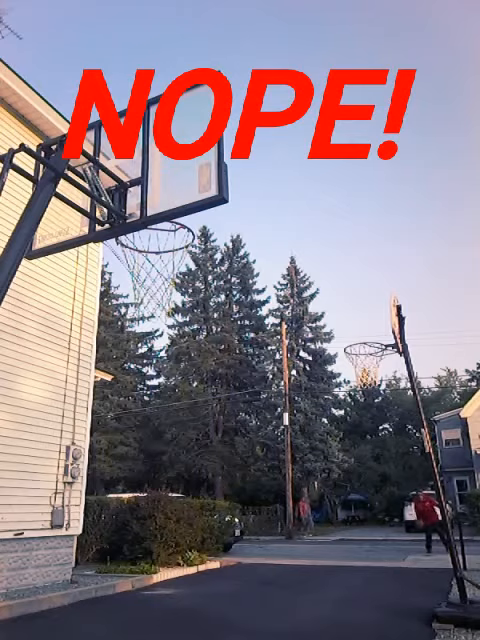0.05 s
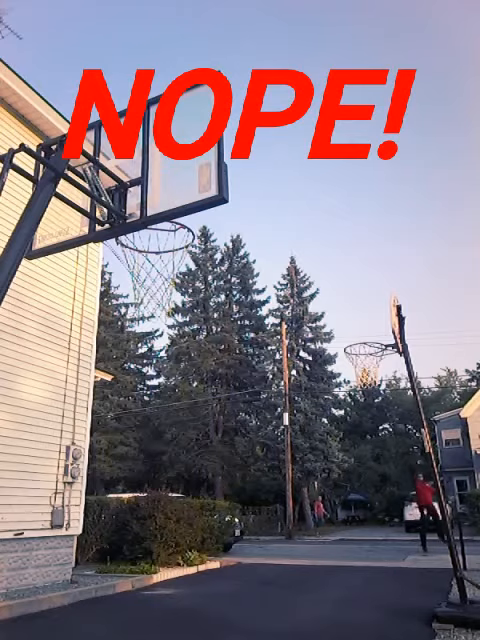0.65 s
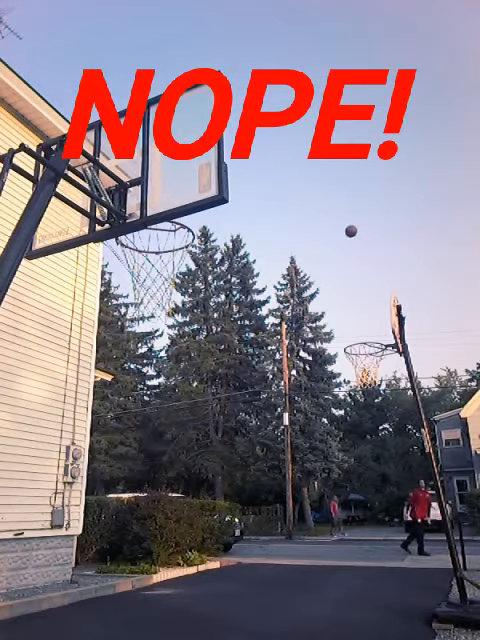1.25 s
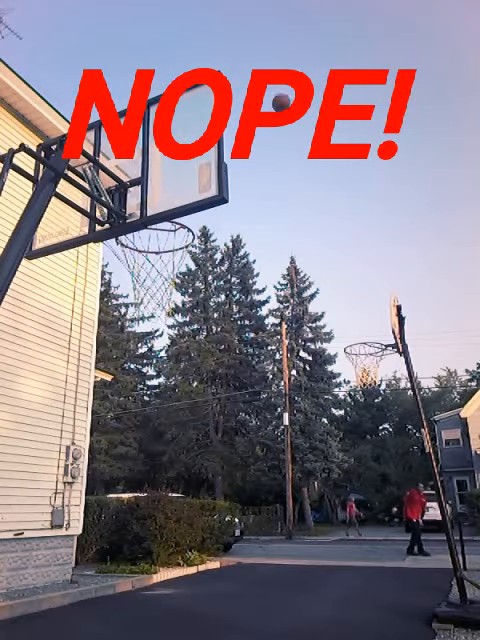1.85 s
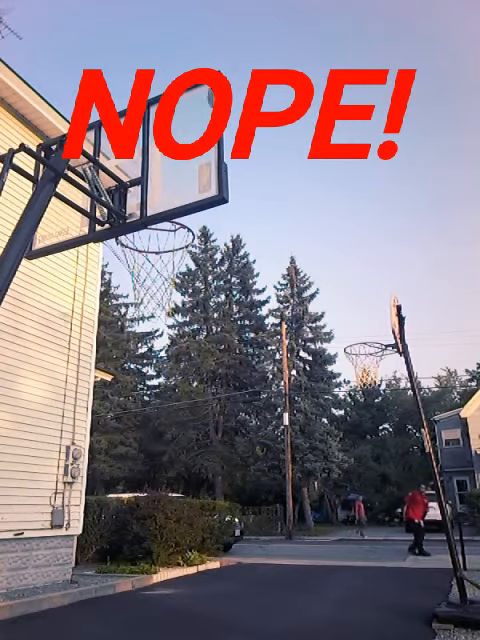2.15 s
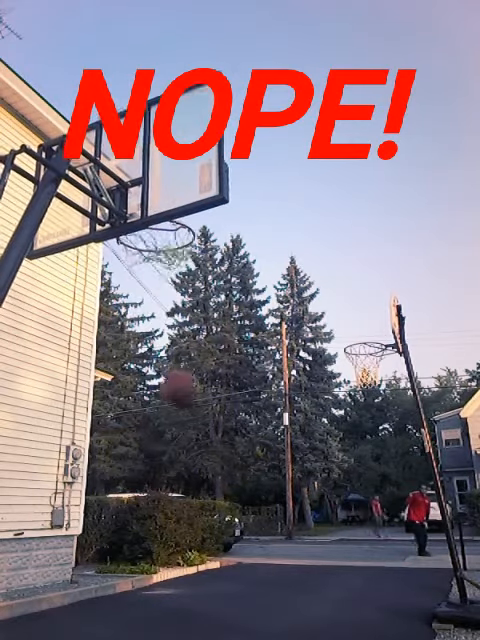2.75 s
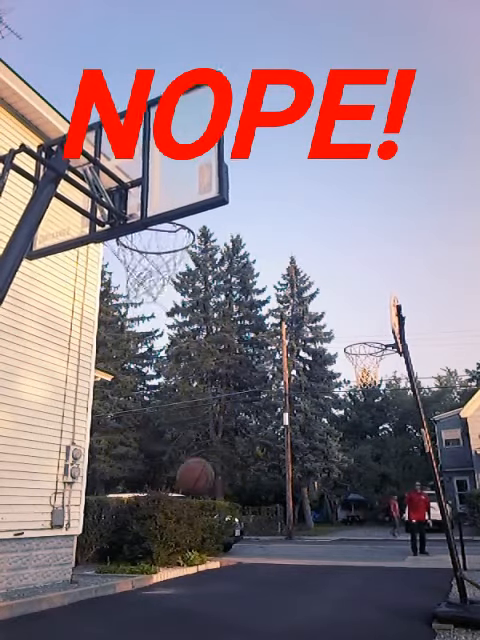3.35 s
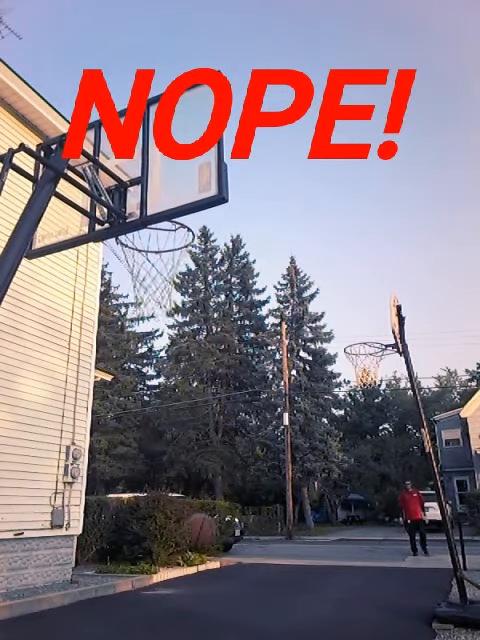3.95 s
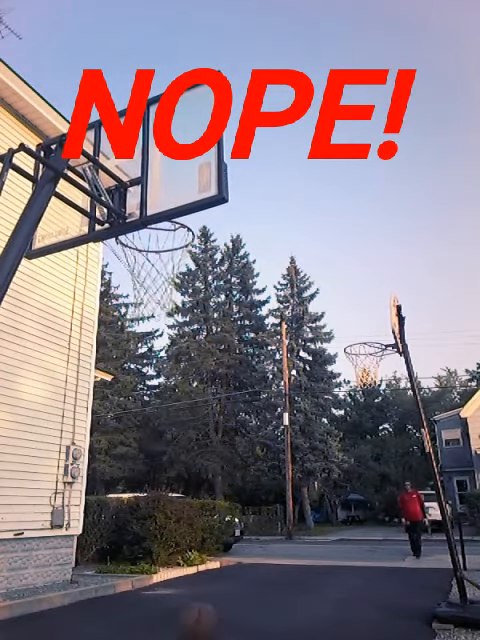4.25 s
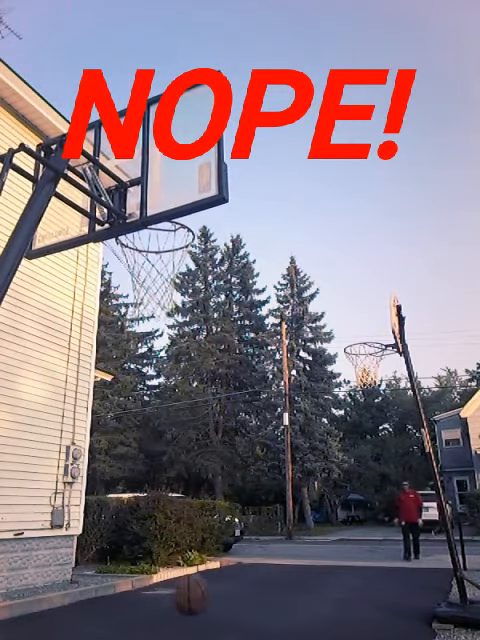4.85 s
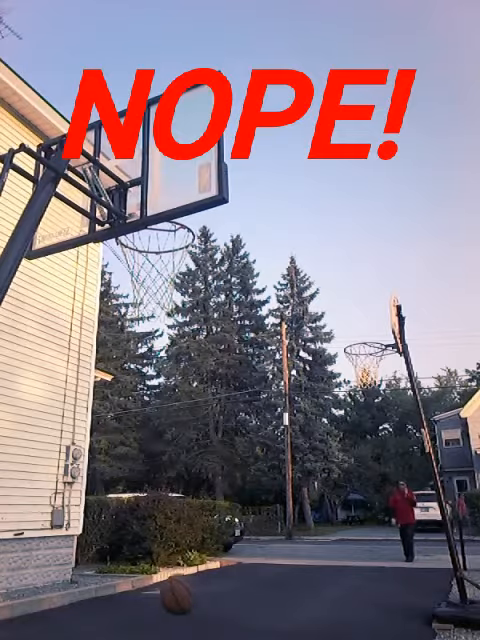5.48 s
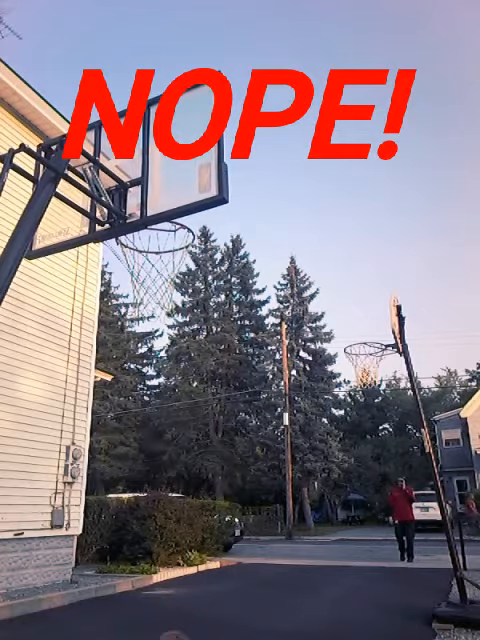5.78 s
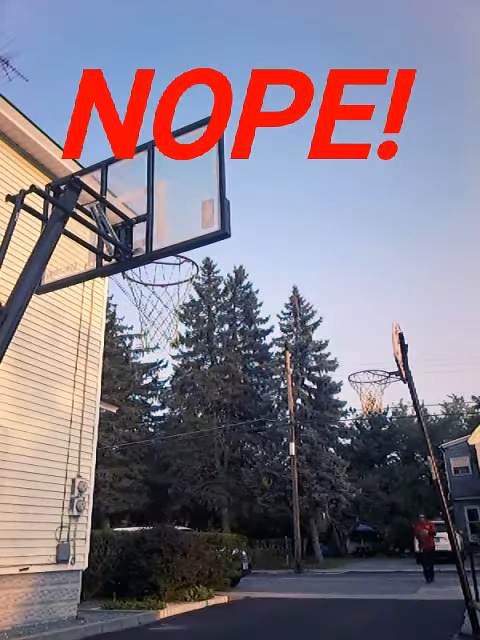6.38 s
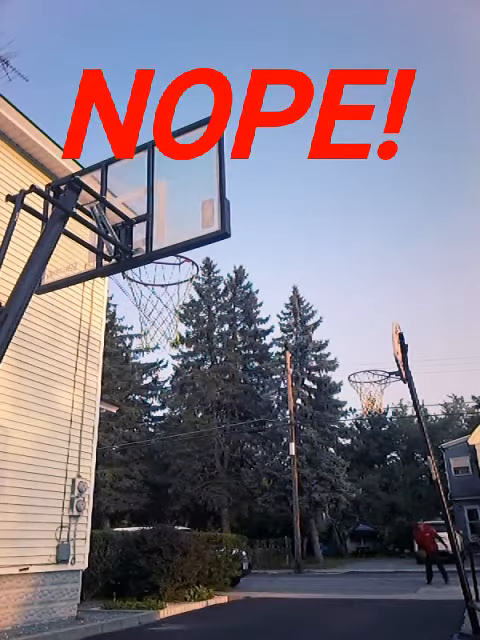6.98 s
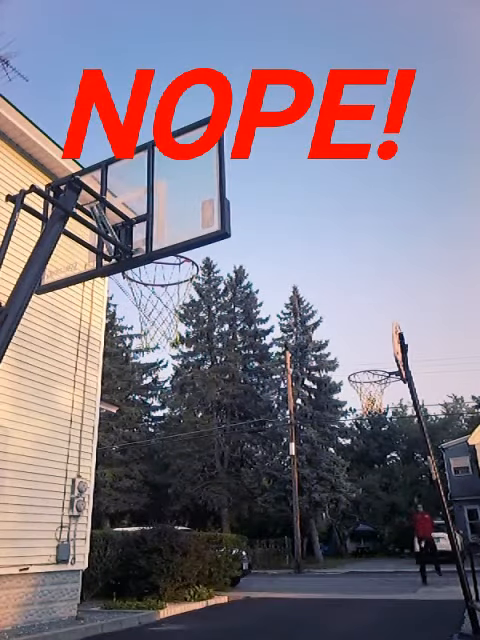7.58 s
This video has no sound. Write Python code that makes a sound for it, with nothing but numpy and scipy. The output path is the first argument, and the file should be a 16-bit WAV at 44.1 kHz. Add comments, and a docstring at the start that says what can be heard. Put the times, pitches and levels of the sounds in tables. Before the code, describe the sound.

A quiet outdoor street: distant traffic murmurs and rumbles throughout, and an insect gives faint, high chirps, often a little over half a second apart. A shoe scuffs very softly at about 1 second. At 2.5 seconds a basketball hits a portable hoop with a loud bang; board and pole boom, fittings rattle and the net whips for about half a second, leaving a faint steel ring. The ball bounces on asphalt at about 3.1, 4.2, 5.1 and 5.8 seconds, each sharp thump weaker, with a short echo off the house. Underneath, a low engine hum swells until around 5 seconds and fades. Just before 6 seconds the ball knocks the foot of the stand, which shudders briefly. The background then grows quieter, with a far car's low drone and a few very faint bird notes from about 7 seconds to the end.

```python
"""Street traffic murmurs, an insect chirps with its wings and a shoe scuffs the road.
At 2.5 seconds a basketball bangs into a portable hoop: board and pole boom, fittings rattle, the net whips.
While a car's hum swells, the ball bounces four times on asphalt, each thump echoing off a house wall.
Near 6 seconds it knocks the foot of the stand, which shudders. Last, a far car drones and a bird calls."""
import sys
import numpy as np
from scipy import signal
from scipy.fft import rfft, irfft, next_fast_len
from scipy.io import wavfile
from scipy.ndimage import map_coordinates

SR = 44100
rng = np.random.default_rng(int(sys.argv[2]) if len(sys.argv) > 2 else 0)


def output_pcm(signal):
    """Save a mono or channel-first signal as 16-bit PCM at the path in sys.argv[1].

    Samples are clipped to [-1, 1] before scaling.
    """
    pcm = np.clip(np.atleast_2d(signal).T, -1, 1) * 32767
    wavfile.write(sys.argv[1], SR, np.round(pcm).astype(np.int16))


N = 340452

# Tone colours. Each row: frequency in Hz, relative level in dB.
RUMBLE_COLOUR = [(20, -52), (38, -21.5), (58, -5), (90, 2), (112, 2.5), (140, -3.5), (243, -7),
                 (337, -17.5), (450, -30), (1000, -70)]  # low part of the traffic
MURMUR_COLOUR = [(150, -28.5), (400, 2), (1000, -4), (1600, -8.5), (2800, -17), (3800, -29.5), (5400, -36),
                 (6700, -26), (8300, -34), (15500, -31.5)]  # higher part of the traffic
SCUFF_COLOUR = [(2500, -5), (4000, -10), (5400, -18.5), (6300, 3.5), (7200, 1), (8200, -3), (9000, -21),
                (12000, -40)]  # a shoe scraping the road
STEP_COLOUR = [(100, -22), (500, 3), (1400, 7), (2800, -5.5), (4500, -34.5), (12000, -46)]  # a duller shuffle
CHORUS_COLOUR = [(3800, -52), (4400, -3), (4620, -6.5), (5200, -47.5)]  # other insects far off
SHAKE_COLOUR = [(29, -42), (50, -19), (120, 2.5), (172, -14), (217, -12), (306, -25), (376, -19),
                (609, -20.5), (920, -19.5), (2200, -22), (4690, -49.5), (6600, -45), (9000, -53),
                (15600, -88), (22000, -120)]  # the jolted stand
ASPHALT_THUMP = [(25, -58), (45, -30), (60, -9), (110, 0), (170, -10), (260, -15), (380, -19), (560, -37),
                 (1500, -46), (4000, -66), (15000, -100)]  # the ball squashing on the ground
FOOT_THUMP = [(25, -63), (45, -24), (60, 2), (110, 0), (170, -4), (260, -5), (450, -22), (800, -18.5),
              (4000, -73)]  # the ball squashing on the stand's foot
GRIT_COLOUR = [(500, -9), (2500, 0.5), (4000, -12), (5300, -5.5), (6600, 2.5), (8300, -9), (10000, -21.5),
               (15000, -46.5)]  # grit under the ball
FITTINGS_COLOUR = [(300, -15.5), (800, 10), (1700, 1), (2900, -2.5), (4000, -16), (5500, -14.5),
                   (9000, -23), (15000, -42)]  # loose parts of the hoop
NET_COLOUR = [(1000, -15), (4000, -9.5), (5400, -14), (6000, -2), (6700, 3), (7500, -10), (8300, -10.5),
              (9300, -27), (15000, -34.5)]  # whipping cords
FRAME_COLOUR = [(30, -51.5), (46, -14), (58, -10.5), (90, -7.5), (115, -4), (160, 0), (225, -3), (280, -3),
                (350, -12.5), (560, -14.5), (660, -26), (1480, -31.5), (2900, -35.5), (3940, -51.5),
                (6750, -44), (9500, -59), (15500, -91)]  # the dense ring of the whole frame

# Swells. Each holds: level in dB, then rise, hold and fade time in seconds.
# A fade time (t60) is how long a sound takes to drop by 60 dB.
DRONE_SWELL = (-56, 1, 0.44, 1)  # a far car
ENGINE_SWELL = (-40.5, 2.5, -0.21, 3)  # an idling car; its negative hold starts the fade early
SCUFF_SWELL = (-65, .1, .06, .55)
STEP_SWELL = (-55, .06, .01, .3)
SHAKE_SWELL = (-45.5, .04, .11, .65)
RIM_SWELL = (-61, .08, .3, 1.3)  # the steel ring singing on faintly

# How long sound lingers. Each row: frequency in Hz, fade time in seconds.
YARD_FADES = [(100, 0.63), (1000, 0.566), (3000, 0.92), (7000, 0.27), (12000, 0.14)]
FRAME_FADES = [(80, 2.393), (250, 0.75), (600, 1.77), (1500, 1.56), (3000, 1.6), (7000, 1.9), (14000, 1.4)]
# Ringing tones. Each row: pitch in Hz, relative level in dB, fade time in seconds.
BALL_AIR_TONES = [(399.7, -8, 0.074), (711, 2, 0.029), (850, -3.5, 0.045), (931.5, 6.5, 0.04),
                  (1005, 3.5, 0.06), (1178, 7, 0.037), (1258, -1, 0.043), (1714, -14.5, 0.084),
                  (2000, -18, .06), (2370, -9, 0.03), (3000, -15, 0.044)]  # the air inside the ball
HOOP_TONES = [(55.8, -12, 1.5), (77, -19, 0.5), (122.2, -19.5, 3.5), (209.6, 1.5, .6), (224.7, -1, 1.15),
              (272.6, -1, 0.68), (279.4, -8.5, 1.3), (292, -8, 0.6), (440, -31.5, 0.48), (586, -22.5, .75),
              (687, -28.5, 0.62), (754, -20.5, .7), (1556, -30.5, 0.52), (1710, -33.5, 1.6),
              (2340, -45, 1.2), (2688, -38, .6)]  # board, rim and pole

# The background murmur's level: louder in the middle, quieter after 6 seconds.
# Each row: time in seconds, base level in dB.
BACKGROUND_LEVELS = [(0, -58.5), (1.3, -57.5), (2.0, -59.5), (3.5, -55.0), (5.6, -56), (6.4, -63),
                     (7.72, -62.0)]
# The engine's hum. Each row: multiple of the shaft speed, relative level in dB.
ENGINE_TONES = [(2, -14), (3, 2), (5, -10), (7, -8.5)]
# Bird notes. Each row: start and length in seconds, first and last pitch in Hz, level in dB.
BIRD_NOTES = [(6.922, 0.066, 4030, 3800, -77), (6.964, 0.04, 3050, 2910, -65.5),
              (7.179, 0.022, 3900, 3700, -76), (7.617, 0.092, 2500, 3840, -67.5)]
# Insect chirps. Each row: start in seconds, level in dB.
CHIRPS = [(0.065, -59.5), (.752, -60.5), (1.349, -61), (1.95, -61.5), (3.641, -59.5), (4.268, -58.5),
          (4.872, -60.5), (5.575, -60.5), (6.677, -68), (7.464, -69)]
# The ball's skin. Each row: multiple of the slap pitch, relative level in dB, fade time in seconds.
SKIN_TONES = [(.84, 6.5, 0.0055), (1, 9.5, 0.00591), (1.13, -10.5, 0.014)]
# Bounces. Each row: start in seconds, levels of thump, air ring and slap in dB, slap pitch in Hz.
BOUNCES = [(3.1475, -7, -19, -15, 2490), (4.2474, -11.5, -27, -14, 2640),
           (5.1063, -16.5, -27.5, -21.5, 2486), (5.8021, -21, -32, -26, 2240)]
# The knock on the stand: levels of thump, air ring, slap and grit in dB, then slap pitch in Hz.
FOOT_KNOCK = (-19.5, -39.5, -27, -36.5, 2100)
# Echoes near the house. Each row: delay in seconds, share sent back.
WALL_ECHOES = [(0.0114, 0.15), (0.0171, 0.32), (0.0272, 0.23)]
# Fittings and net. Each row: start in seconds, relative clack level in dB, swish level in dB.
RATTLES = [(2.471, -13.5, -36.5), (2.514, -24.5, -40), (2.57, -17, -35), (2.654, -23, -35.5),
           (2.705, -17.5, -41), (2.784, -20.5, -31), (2.853, -24, -49.5), (2.877, -23, -38.5),
           (2.97, -30, -40), (3.105, -29.5, -41.5)]

BANG_S, FOOT_S = 2.4718, 5.9325  # when the ball hits the hoop, and the stand's foot


def amp(db):
    """Turn decibels into a gain."""
    return 10 ** (np.asarray(db) / 20)


def unit(x):
    """Scale to an average (rms) level of 1."""
    return x / np.sqrt(np.mean(x ** 2) + 1e-20)


def clock(size):
    """The time of each sample in seconds."""
    return np.arange(size) / SR


def along(points, hz):
    """Read between (Hz, value) points on a log frequency axis."""
    freqs, values = np.transpose(points)
    return np.interp(np.log(hz + 1), np.log(freqs + 1), values)


def wobble(rate, size=N):
    """A smooth curve through rate random values a second."""
    return map_coordinates(rng.standard_normal(int(size * rate / SR) + 4), [clock(size) * rate])


def fade(t, t60):
    """Die away by 60 dB every t60 seconds; 1 - fade makes a soft start."""
    return np.exp(-np.log(1000) * t / t60)


def swell(start_s, top_db, rise, hold, t60):
    """A gain that rises, holds, then dies away."""
    t = clock(N) - start_s
    rising = np.sin(np.pi / 2 * np.clip(t / rise, 0, 1)) ** 2
    return amp(top_db) * rising * fade(np.maximum(t - rise - hold, 0), t60)


def add(track, s, sound):
    """Mix a sound in at s seconds."""
    start = max(round(s * SR), 0)
    part = track[start:start + len(sound)]
    part += sound[:len(part)]


def filtered(x, response):
    """Scale each frequency of x by response(hz)."""
    size = next_fast_len(len(x) + 8192)
    return irfft(rfft(x, size) * response(np.fft.rfftfreq(size, 1 / SR)), size)[:len(x)]


def tinted(x, colour):
    """Give x a tone colour made of (Hz, dB) points."""
    return filtered(x, lambda hz: amp(along(colour, hz)))


def noise(colour, size=N):
    """Steady noise with this tone colour."""
    return unit(tinted(rng.standard_normal(size), colour))


def pulse(colour, size=8192):
    """A single knock with this tone colour and a peak of 1."""
    cepstrum = irfft(np.log(amp(along(colour, np.fft.rfftfreq(size, 1 / SR)))))
    # folding onto the first half packs the energy at the start
    cepstrum[1:size // 2] *= 2
    cepstrum[size // 2 + 1:] = 0
    wave = irfft(np.exp(rfft(cepstrum)))
    return wave / np.abs(wave).max()


def burst(colour, envelope):
    """Noise shaped by the envelope, then rung through a body with this tone colour."""
    body = pulse(colour)
    shaking = envelope * rng.standard_normal(len(envelope))
    return signal.fftconvolve(shaking, body / np.linalg.norm(body))[:len(envelope)]


def dying(x, fades):
    """Let each frequency of x die at its own speed."""
    hz, t, bands = signal.stft(x, SR, nperseg=512)
    return signal.istft(bands * fade(t, along(fades, hz)[:, None]), SR)[1][:len(x)]


def ring(tones, t, drift, vary_db):
    """Fading tones, each at a slightly random strength; drift lets their phases wander."""
    out = np.zeros(len(t))
    for hz, db, t60 in tones:
        wander = wobble(19.53, len(t))
        phase = 2 * np.pi * hz * t + drift * (wander - wander[0])
        out += amp(db + vary_db * rng.standard_normal()) * fade(t, t60) * np.sin(phase)
    return out


def scatter(x, t60):
    """A short cloud of tiny echoes of x."""
    t = clock(SR // 8)
    cloud = rng.standard_normal(len(t)) * fade(t, t60)
    return signal.fftconvolve(x, cloud / np.linalg.norm(cloud))[:len(x)]


def yard(x, rise):
    """Echoes from trees and houses build for about rise seconds, then die away."""
    tail = dying(rng.standard_normal(SR), YARD_FADES) * (1 - np.exp(-(clock(SR) / rise) ** 2))
    return signal.fftconvolve(x, tail / np.linalg.norm(tail))[:N]


def traffic():
    """Far traffic: a murmur over a low rumble."""
    level_db = np.interp(clock(N), *np.transpose(BACKGROUND_LEVELS))
    rumble_db = level_db.mean() + 1.35 * (level_db - level_db.mean()) + 10.5  # swings wider
    rumble = amp(rumble_db + 1.165 * wobble(4.2)) * noise(RUMBLE_COLOUR)
    murmur = amp(level_db + 0.72 + 0.42 * wobble(3.91)) * noise(MURMUR_COLOUR)
    return rumble + murmur


def far_car():
    """A low exhaust drone swells as the car nears."""
    exhaust = noise([(80, -47.5), (115, -10.5), (127, -5), (140, -1), (200, -50.5), (600, -110)])
    return swell(6.45, *DRONE_SWELL) * exhaust


def idling_car(shaft_hz=32.9):
    """An engine hums at multiples of its slightly unsteady shaft speed."""
    angle = 2 * np.pi * np.cumsum(shaft_hz + 0.2946 * wobble(2.7) + .2 * wobble(9)) / SR
    hum = sum(amp(db + 3.7 * wobble(3.5)) * np.sin(multiple * angle) for multiple, db in ENGINE_TONES)
    return swell(2.5, *ENGINE_SWELL) * hum


def shoes():
    """Shoes rub the road: a bright scuff, later a dull shuffle."""
    scuff = swell(1.07, *SCUFF_SWELL) * noise(SCUFF_COLOUR)
    shuffle = swell(5.41, *STEP_SWELL) * noise(STEP_COLOUR)
    return amp(1.1 * wobble(60)) * (scuff + shuffle)


def bird():
    """A few thin gliding notes, blurred by distance."""
    out = np.zeros(N)
    for s, length, start_hz, end_hz, db in BIRD_NOTES:
        size = round(length * SR)
        hz = np.linspace(start_hz, end_hz, size) + 110 * wobble(220, size)
        add(out, s, amp(db) * np.hanning(size) * np.sin(2 * np.pi * np.cumsum(hz) / SR))
    return scatter(out, t60=0.1) + amp(-17) * yard(out, rise=.02)


def insect(pitch_hz=4660, stroke_gap_s=.0455):
    """Three wing strokes a chirp, the first one weak; the pitch sags as each stroke slows."""
    out, t = np.zeros(N), clock(round(0.0254 * SR))
    progress = t / t[-1]
    for s, db in CHIRPS:
        for k, stroke_db in enumerate([-4, -1, 0]):
            sag_hz = 380 * amp(db + stroke_db + 61.5)  # louder strokes sag further
            hz = pitch_hz + 25 * rng.standard_normal() - sag_hz * progress ** 1.8
            hz -= 70 * (1 - progress) ** 6  # a quick slide up at the start
            stroke = signal.windows.tukey(len(t), .5) * np.sin(2 * np.pi * np.cumsum(hz) / SR)
            add(out, s + k * stroke_gap_s, amp(db + stroke_db + rng.standard_normal()) * stroke)
    leaf_echoes = amp(-9) * scatter(out, t60=.18)
    chorus = amp(-91 + 3 * wobble(42)) * noise(CHORUS_COLOUR)
    return out + leaf_echoes + chorus + amp(-17) * yard(out, rise=0.025)


def stand():
    """The jolted stand shudders for a moment."""
    shudder = amp(2.2 * wobble(220) + 1.5 * wobble(50))
    return swell(FOOT_S, *SHAKE_SWELL) * shudder * noise(SHAKE_COLOUR)


def ball_hit(thump_colour, thump_db, air_db, slap_db, grit_db, slap_hz):
    """The skin slaps on grit, the ball squashes with a low thump and the air inside rings."""
    thump = pulse(thump_colour)
    t = clock(len(thump))
    air = ring(BALL_AIR_TONES, t, drift=1.3, vary_db=1.2) * (1 - fade(t, .008))
    skin = [(ratio * slap_hz, db, t60) for ratio, db, t60 in SKIN_TONES]
    slap = 0.61 * ring(skin, t, drift=.1, vary_db=0.5) * (1 - fade(t, 0.0031))
    grit = burst(GRIT_COLOUR, 0.58 * fade(t, 0.0073) + 0.061 * fade(t, 0.081))
    return amp(thump_db) * thump + amp(air_db) * air + amp(slap_db) * slap + amp(grit_db) * grit


def ball():
    """Ever weaker bounces echo off the wall, whose siding scatters the treble; then the stand is hit."""
    out = np.zeros(N)
    low = signal.butter(3, 1300, "low", fs=SR, output="sos")
    high = signal.butter(2, [1400, 4200], "band", fs=SR, output="sos")
    for s, thump_db, air_db, slap_db, slap_hz in BOUNCES:
        grit_db = 2 + 2.28 * thump_db  # harder bounces crunch far more
        hit = ball_hit(ASPHALT_THUMP, thump_db, air_db, slap_db, grit_db, slap_hz)
        add(out, s, hit)
        bass, treble = signal.sosfilt(low, hit), signal.sosfilt(high, hit)
        for delay, share in WALL_ECHOES:
            add(out, s + delay, share * (bass + 0.94 * scatter(treble, t60=0.024)))
        add(out, s + 0.0015, amp(-13.5) * scatter(treble, t60=0.19))
    knock = ball_hit(FOOT_THUMP, *FOOT_KNOCK)
    add(out, FOOT_S, knock)
    add(out, FOOT_S + 0.009, 0.26 * signal.sosfilt(low, knock) + 0.23 * scatter(knock, t60=0.018))
    return out


def rattles(ticks_per_s=70):
    """Fittings clack and net cords whip as the frame sways; ever weaker contacts tick in between."""
    out, t = np.zeros(N), clock(SR // 3)
    for s, clack_db, swish_db in RATTLES:
        chatter = unit(amp(1.7 * wobble(400, len(t)))) * (1 - fade(t, 0.0034))
        add(out, s, amp(clack_db - 9.5) * burst(FITTINGS_COLOUR, chatter * fade(t, 0.11)))
        add(out, s, amp(swish_db) * burst(NET_COLOUR, chatter * fade(t, .12)))
    contacts = (rng.random(SR) < ticks_per_s / SR) * amp(-37.5 - 1.5 * rng.standard_normal(SR))
    ticks = signal.fftconvolve(contacts * fade(clock(SR), 1.5), fade(t, 0.069))
    add(out, BANG_S, burst(FITTINGS_COLOUR, ticks) + amp(-11.5) * burst(NET_COLOUR, ticks))
    return out


def hoop(rim_hz=2880, beat_hz=13, rim_start_s=3.12):
    """The blow sets board and pole booming; the frame clatters and the steel rim sings on."""
    out, t = np.zeros(N), clock(round(1.4 * SR))
    boom = ring(HOOP_TONES, t, drift=0.86, vary_db=0.5) * (1 - fade(t, 0.073))
    frame = dying(noise(FRAME_COLOUR, len(t)), FRAME_FADES) * (1 - fade(t, 0.022))
    add(out, BANG_S, amp(-8) * boom + amp(-11.5) * frame)
    # the board's first whack is broad and soon gone
    whack_colour = [(60, -58), (130, -3.5), (240, 2), (500, 2), (780, 1.5),
                    (1100, -28), (3000, -19), (4200, -53), (8000, -56.5)]
    add(out, BANG_S, amp(-9) * burst(whack_colour, fade(t, 0.079) * (1 - fade(t, 0.0018))))
    out += rattles()
    rim_tones = [(rim_hz, 0, 3), (rim_hz + beat_hz, -4, 3)]  # two close tones throb together
    rim_t = np.maximum(clock(N) - rim_start_s, 0)
    out += swell(rim_start_s, *RIM_SWELL) * ring(rim_tones, rim_t, drift=.6, vary_db=5.5)
    # cut the deep bass below 50 Hz from the hoop's bang
    return signal.sosfilt(signal.butter(6, 50, "high", fs=SR, output="sos"), out)


def scene():
    """Ball and hoop with their echoes, over the sounds of the street."""
    hits = ball() + hoop()
    yard_colour = [(300, -5), (1100, -9), (1700, 3), (2700, -5), (6000, 7), (7000, 14.5), (12000, -20.5)]
    out = hits + amp(-20) * yard(tinted(hits, yard_colour), rise=0.088)
    # the houses across the road send back mostly the thump
    add(out, .176, amp(-12.5) * tinted(hits, [(130, -5), (400, -16), (2000, -20)]))
    return (out + stand() + insect() + bird() + traffic() + idling_car() + shoes() + far_car())[None]


def record(dry, ceiling=.9, top_hz=15750):
    """The phone rounds off the highest peaks and keeps nothing above top_hz."""
    rounded = dry[0] / (1 + np.abs(dry[0] / ceiling) ** 6) ** (1 / 6)
    return filtered(rounded, lambda hz: hz < top_hz)[None]


dry = scene()
out = record(dry)
output_pcm(out)
```